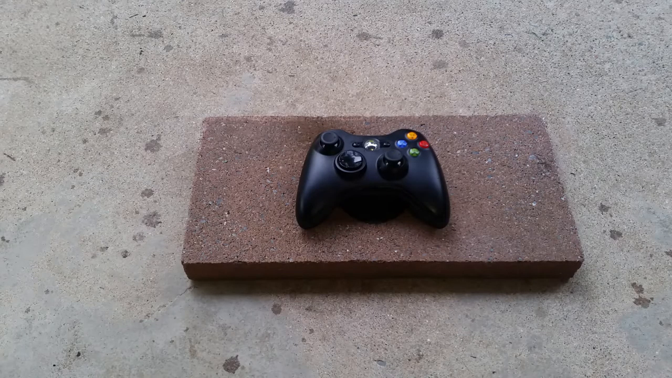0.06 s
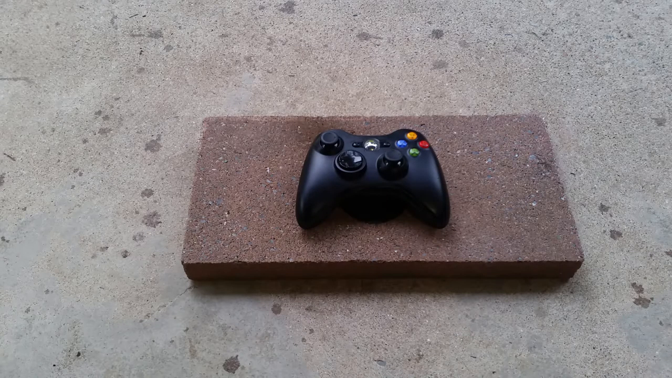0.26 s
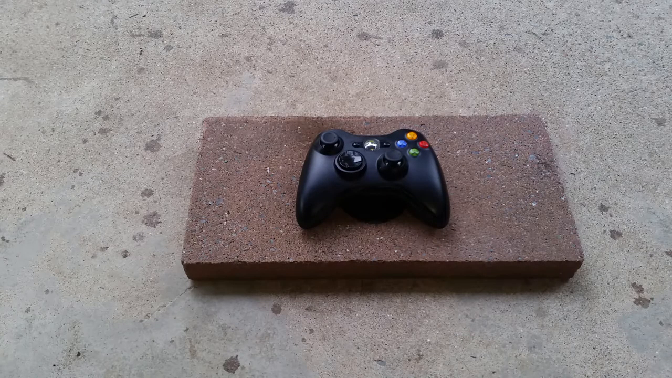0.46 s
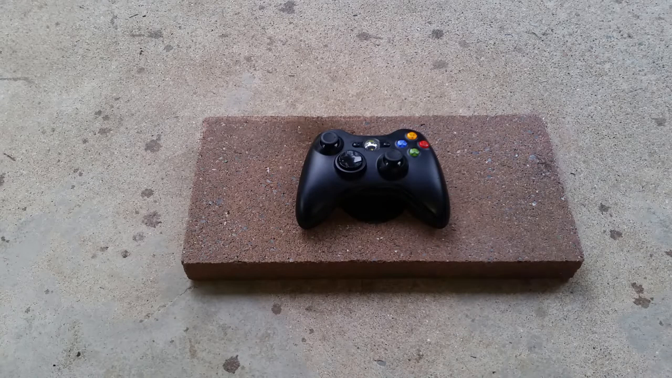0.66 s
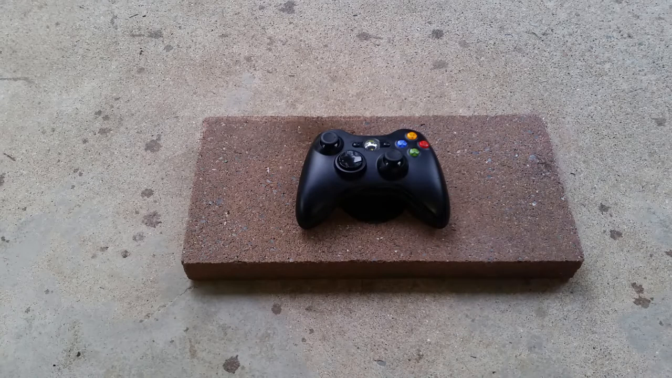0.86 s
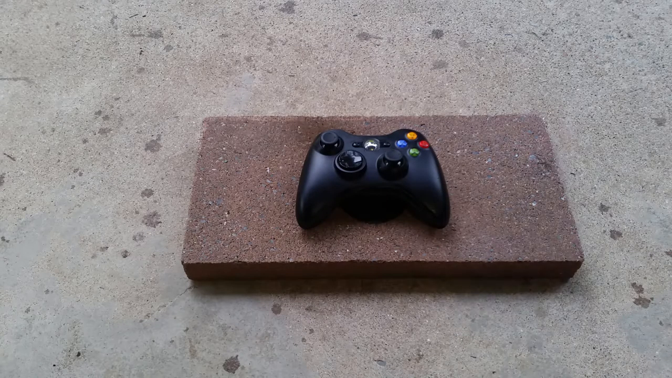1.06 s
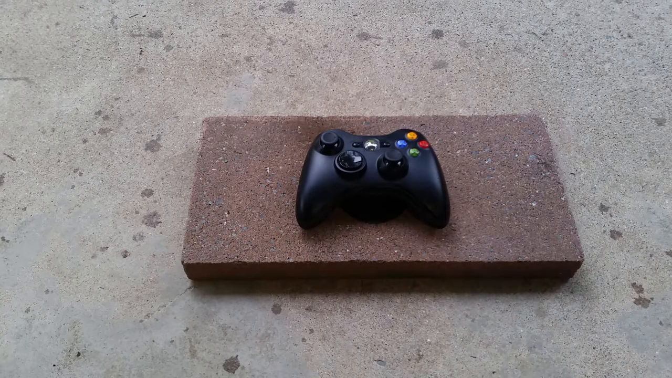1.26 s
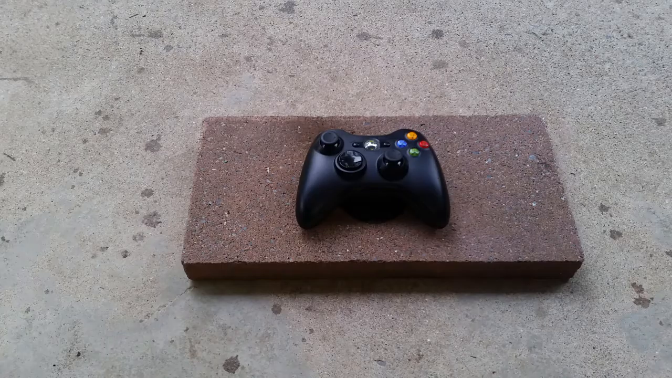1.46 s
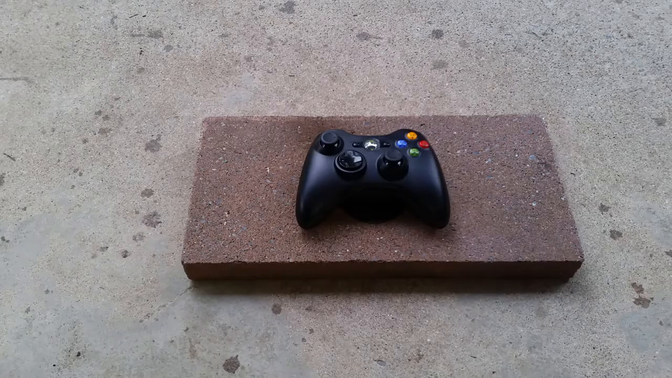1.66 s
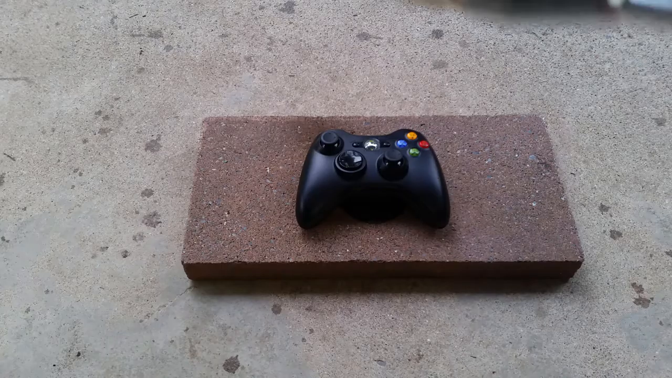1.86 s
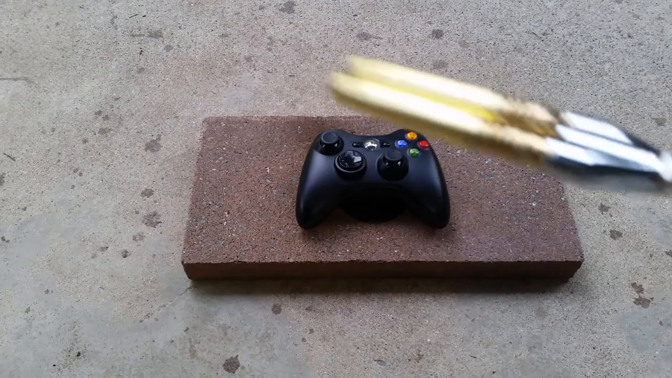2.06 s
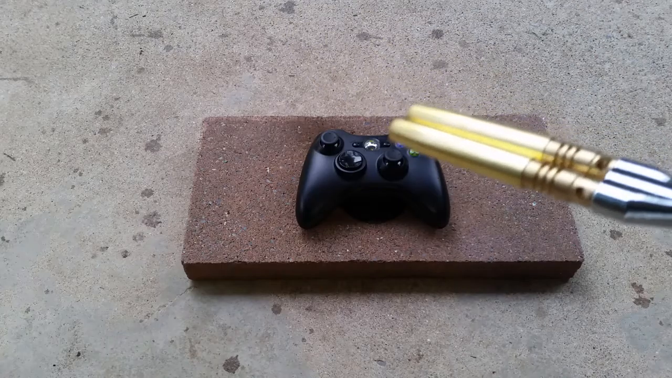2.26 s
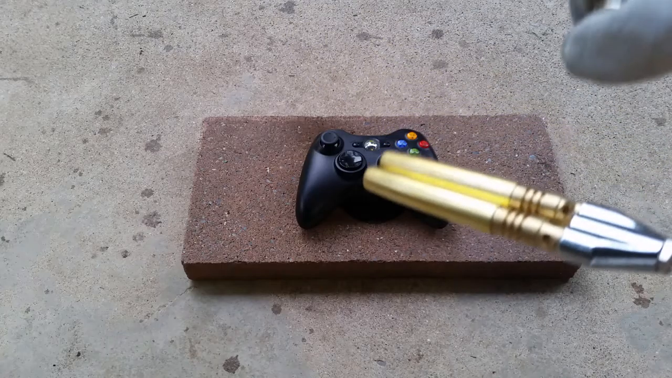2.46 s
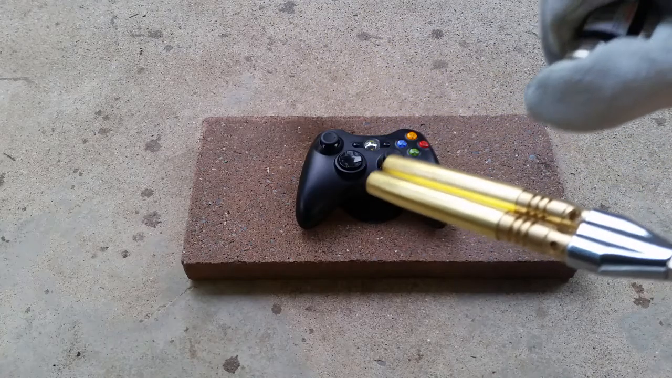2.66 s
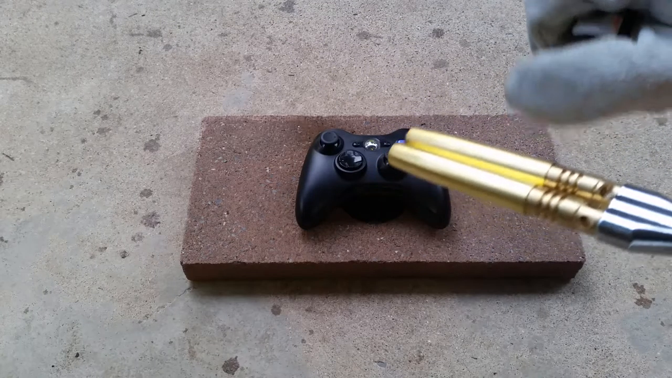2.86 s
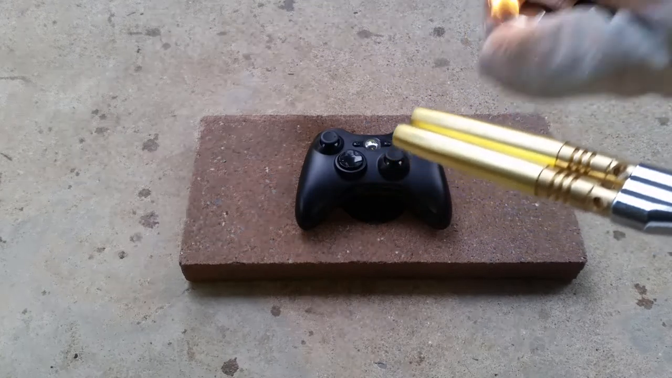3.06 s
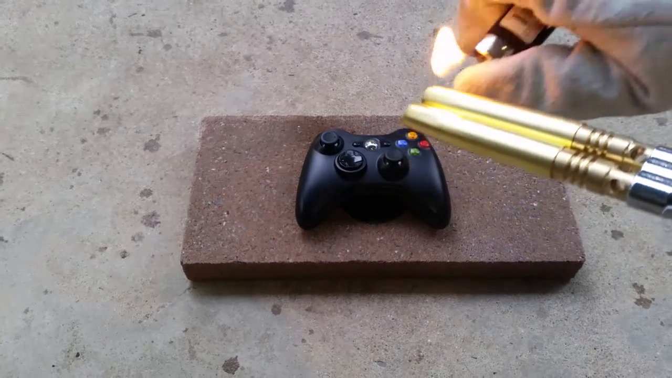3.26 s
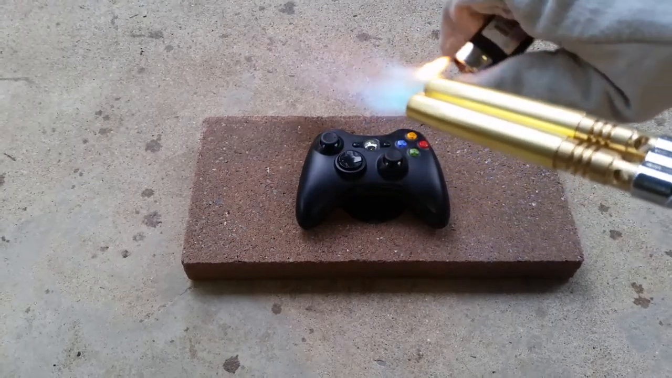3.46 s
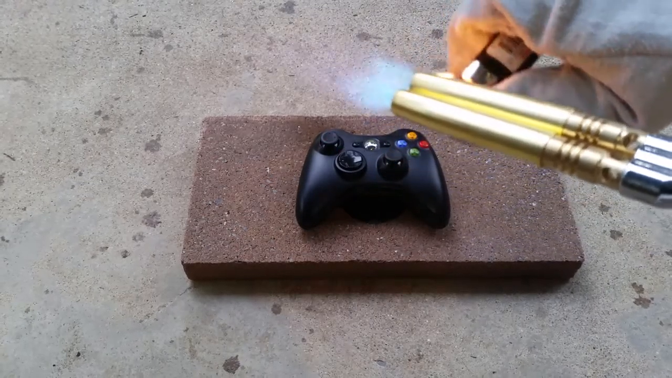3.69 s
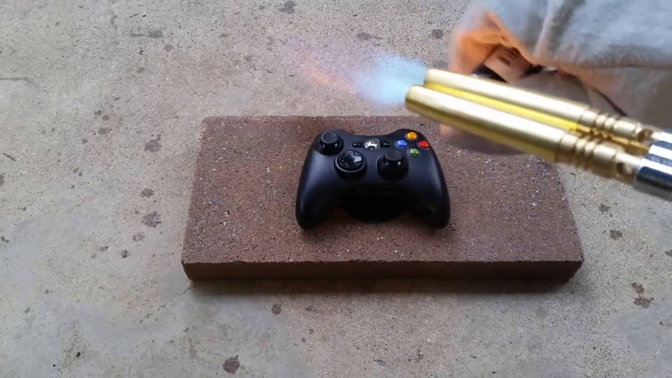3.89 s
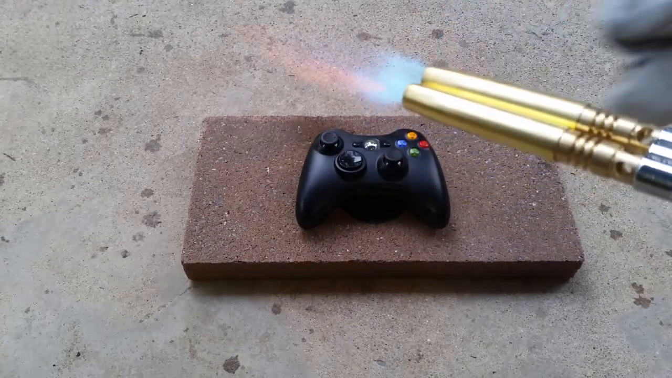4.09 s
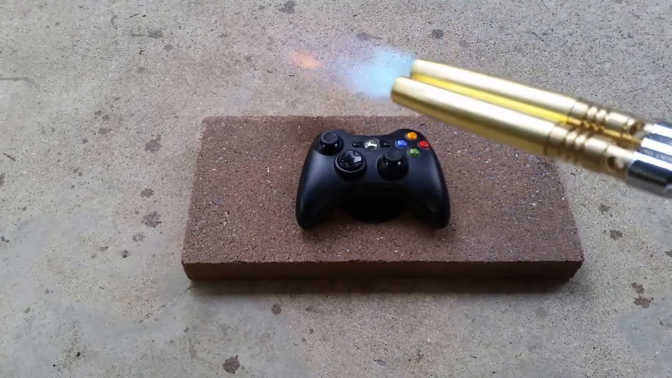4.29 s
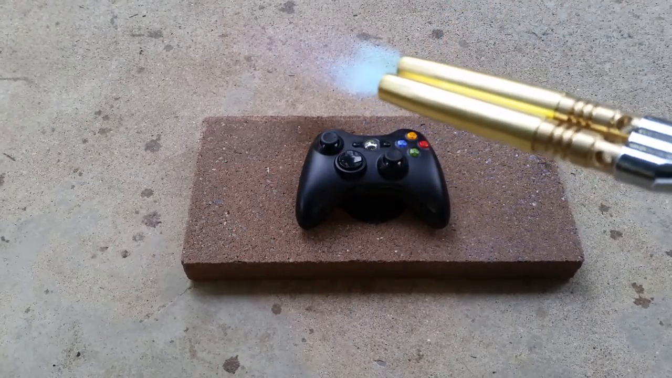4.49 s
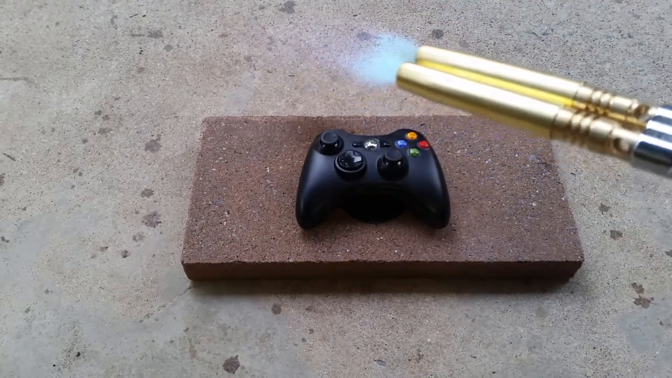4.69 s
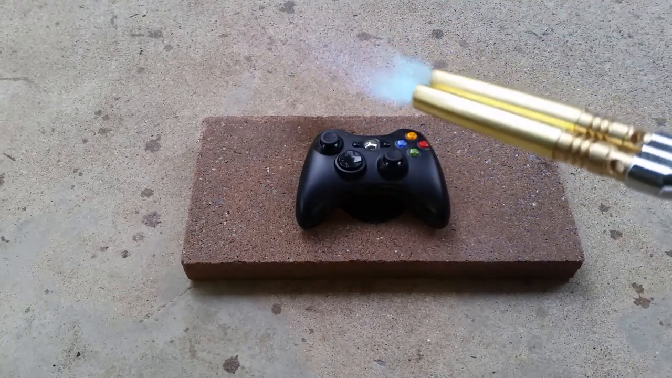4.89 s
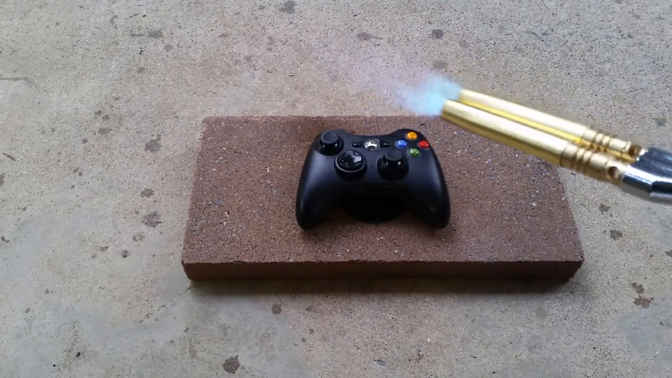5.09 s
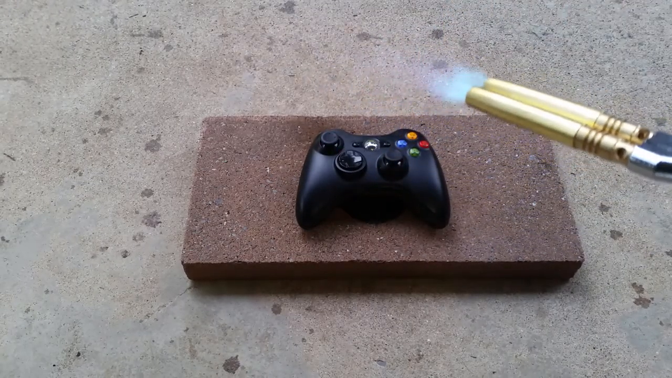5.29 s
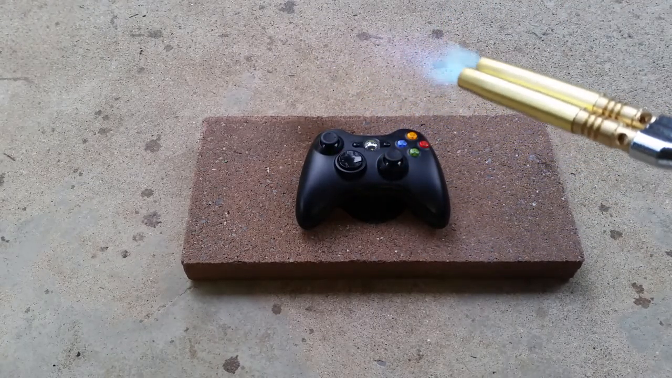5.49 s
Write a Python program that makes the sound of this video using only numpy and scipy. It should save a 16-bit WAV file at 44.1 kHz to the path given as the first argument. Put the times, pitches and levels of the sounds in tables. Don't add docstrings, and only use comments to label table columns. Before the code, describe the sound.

Close outdoor stereo sound of a twin-tube gas torch over concrete and a brick. Unlit gas hisses with breathy whistling tones that waver as the hand turns. A tiny gritty lighter scrape comes around three seconds, then gas catches with a low thump and a much louder, full, fluttering roar takes over. Its colour shifts as the torch lowers. Faint distant rumble sits beneath.

```python
import sys
import numpy as np
from scipy import signal
from scipy.io import wavfile
from scipy.ndimage import uniform_filter1d

SR = 44100
rng = np.random.default_rng(int(sys.argv[2]) if len(sys.argv) > 2 else 0)


def generate_wav(sig):
    pcm = np.round(np.clip(np.atleast_2d(sig).T, -1, 1) * 32767).astype(np.int16)
    wavfile.write(sys.argv[1], SR, pcm)


def elevation(decibels):
    levels = np.asarray(decibels, float)
    return 10 ** (levels / 20)


N = 244314
T = np.arange(N) / SR
HZ = np.fft.rfftfreq(1024, 1 / SR)[:, None]
FRAME_S = np.arange(N // 256 + 2) * 256 / SR
CATCH_S = 3.368
LEFT_LEADS_MS = 0.042

# pitch_hz, likeness (0-1)
LIKENESS = [(60, .99), (600, .98), (2000, .9), (4000, .78), (6000, .62), (14000, .55)]
# pitch_hz, right_density_db, lean_db
YARD_RUMBLE = [(25, -104, -13), (49.4, -101.5, -12), (102.4, -83.5, -2), (198, -90, -11),
               (330, -94.5, -11.5), (790, -104, 4.5), (1990, -115, 6)]
# time_s, level_db, length_s
RASP_GRIPS = [
    (2.996, -58, 0.0061),
    (3.02, -51, 0.0075),
    (3.035, -56.5, 0.0092),
]
# pitch_hz, density_db
FLINT_TONE = [(80, -32), (180, -29), (350, -32), (1000, -44), (3000, -38), (4800, -35.5), (5600, -44),
              (9000, -47), (14000, -58)]
# time_s, level_db, pitch_hz, length_s
GAS_POCKETS = [
    (3.380, -38, 169, 0.0027),
    (3.3872, -37, 255, 0.0033),
    (3.389, -38.5, 452, 0.0076),
    (3.398, -46, 112, 0.023),
    (3.4, -49.5, 62, 0.026),
    (3.412, -47, 504, 0.0036),
]
# time_s, front (0-1), left_lag_ms, ground_echo_ms
APPROACH_PATH = [
    (0, 0.11, 0.24, 3.2),
    (.5, 0.01, 0.2, 2.2),
    (.95, 0.24, 0.17, 4.3),
    (1.3, 0.47, -0.026, 1.74),
    (1.9, 0.68, -0.032, 2.1),
    (2.2, 0.71, 0.0023, 1.9),
    (3.37, 0.75, -0.0023, 1.38),
]
# time_s, nearer_db, turned_left (0-1), wrist_roll (-1 to 1)
HAND_MOVES = [(0, 1.5, 0.2, 0.089), (.2, -4, .15, 0.91), (.6, 3, .4, -0.91), (.85, -0.5, 0.5, -0.42),
              (1.2, -2, 0.45, -1), (1.4, 2.5, 0.73, 0.011), (1.65, 2, 0.7, 0.24), (1.9, -4, 0.87, 0.1),
              (2.0, -4, 0.7, 0.93), (2.15, -2, 0.2, -.3), (2.4, 0.5, .3, -0.015), (2.6, -5, 0.4, 0.25),
              (3.0, 3, .35, -0.34), (3.37, 6, 0, -.4)]
# time_s, pitch_hz
WHISTLE_PITCH = [
    (0, 1300),
    (.9, 1326),
    (1.97, 1350),
    (2.02, 1220),
    (2.28, 1290),
    (2.6, 1273),
    (3.37, 1240),
]
# pitch_hz, width_hz
NOZZLE_TONES = [(5220, 280), (6550, 290), (11750, 590), (13200, 670)]
# level_db, nearness_share, front_db, roll_db
BEAM_LEVELS = [
    (-50.5, 0.4, -5, 1.5),
    (-56, 0.55, -13.5, 0),
    (-57, 0.58, -0.1, 7),
    (-52.5, 0.65, -4, 0.8),
    (-56.5, 0.22, -3, 1.5),
]
# lean_db, turn_db, front_db, roll_db
BEAM_LEANS = [
    (-5, 8, -6, -4.5),
    (-26, 23, 12, .5),
    (-5.5, 4.5, -4, -8),
    (-18.5, 16, 4, -.5),
    (-15.5, 1.5, 12, -5),
]
# pitch_hz, width_hz, level_db, lean_db
STEADY_TONES = [(1020, 190, -64, -18), (1710, 100, -73.5, 2), (3240, 120, -77.5, 6), (8070, 250, -69, -0.5),
                (9810, 200, -68.5, -4.5), (14000, 700, -70, -10)]
# pitch_hz, right_density_db, lean_db, front_right_density_db, front_lean_db
COLD_HISS = [(273, -104, 1.5, -104, 8), (690, -91.5, -18, -98.5, -17), (1300, -81, -2, -99.5, 14),
             (2020, -91, -3, -99, -6), (2700, -99, 6, -103, 1), (3050, -92, -18, -99, -6),
             (4340, -93.5, -12.5, -101, -6), (5900, -100, -4, -94, -2), (7160, -96.5, 6, -100, -20),
             (8700, -93, -22, -97.5, 5), (10600, -92.5, -7, -97, -7), (14500, -91, -10, -102, -1)]
# pitch_hz, width_hz, level_db, lean_db
HOT_TONES = [(3700, 210, -61, -20), (4100, 130, -71, 4), (5250, 960, -65, -16), (6820, 470, -64, -18),
             (9260, 1100, -67.5, -16), (11500, 700, -60, -7), (13160, 700, -61.5, -7),
             (14200, 600, -69, -7)]
# pitch_hz, right_density_db, lean_db
ROAR_TONE = [(25.3, -134, -33), (61, -92, 5), (149, -71.5, -2.5), (305, -70.5, -4.5), (620, -68.5, -4),
             (1130, -74, -3.5), (1554, -76.5, -1.5), (2140, -83.5, -0.5), (2950, -87, -2.5),
             (4470, -95.5, -3.5), (7600, -101, 4), (9100, -106, 0.5), (10300, -102, -1.5),
             (14400, -108.5, -15)]
# time_s, lowered (0-1)
LOWERING = [
    (3.4, 0.19),
    (4.8, 0.04),
    (4.95, 0.22),
    (5.1, 0.45),
    (5.22, 0.96),
    (5.54, 0.98),
]
# high_delay_ms, high_gain, low_delay_ms, low_gain
LEFT_ECHOES = [(1.27, 0.18, 1.07, 0.23), (1.69, 0.15, 1.31, 0.34), (1.83, 0.15, 1.6, -0.26),
               (2.44, 0.29, 2.11, 0.23), (2.75, -0.28, 2.32, -0.21), (3.09, -0.25, 2.76, -0.14),
               (3.71, 0.26, 3.05, -0.17), (4.77, -0.13, 4.9, 0.06), (5.08, 0.14, 4.9, 0.35),
               (5.32, -0.28, 4.6, 0.14), (8.3, -0.28, 20, -0.0074)]
RIGHT_ECHOES = [(1.116, 0.33, 0.39, 0.08), (1.676, 0.36, 1.292, 0.67), (1.166, -0.11, 1.665, -0.34),
                (2.3, 0.033, 1.93, 0.33), (2.53, -0.089, 2.32, -0.31), (2.83, -0.14, 2.57, -0.12),
                (5.5, 0.049, 3.26, 0.0063), (5.2, -0.29, 3.6, 0.09), (8.7, 0.45, 3.26, 0.17),
                (14, 0.14, 5.38, 0.041), (5.7, 0.074, 6.45, 0.031)]
# pitch_hz, left_density_db, right_density_db
FAINTEST_KEPT = [(1500, -112, -112), (2500, -102.5, -100.5), (7000, -102, -99), (9000, -102.5, -100),
                 (11000, -102.5, -99.5), (14500, -104, -101)]


def read(points, column=1):
    rows = np.transpose(points)
    return np.interp(np.log(HZ + 1), np.log(rows[0] + 1), rows[column])


def curve(rows, t=FRAME_S):
    s, *columns = np.transpose(rows)
    return [np.interp(t, s, c) for c in columns]


def sides(right_db, lean_db):
    return elevation(2 * np.array([right_db + lean_db, right_db + 0 * lean_db]))


def steady(power):
    return power * np.ones_like(FRAME_S)


def mode(hz, width_hz, level_db, lean_db, skirt=1.26):
    shape = (1 + (2 * (HZ - hz) / width_hz) ** 2) ** -skirt / width_hz
    return sides(steady(level_db), steady(lean_db))[:, None] * shape


def delay(ms):
    return np.exp(-2j * np.pi * HZ * ms / 1000)


def slow(hz):
    x = signal.lfilter(*signal.butter(2, np.clip(hz, 1, 2000), fs=SR), rng.standard_normal(N))
    return x / x.std()


def blotches(shape, bins, frames):
    x = uniform_filter1d(rng.standard_normal(shape), bins, axis=-2)
    x = uniform_filter1d(x, frames, axis=-1)
    return x / x.std()


def noise(power, path=1, patchy_db=1.2):
    right, own = signal.stft(rng.standard_normal((2, N)), nperseg=1024, noverlap=768)[2]
    same = np.clip(read(LIKENESS), 0, 1)
    bend = 1.3 * blotches(right.shape, bins=16, frames=120) / (1 + (3500 / (HZ + 1)) ** 2)
    left = same * right * np.exp(1j * bend) + np.sqrt(1 - same ** 2) * own
    left = left * delay(-LEFT_LEADS_MS)
    patches = elevation(patchy_db * blotches((2,) + right.shape, bins=4, frames=44))
    gain = np.sqrt(power * SR / 2) * patches * path
    both = np.array([left, right]) * gain[..., :right.shape[1]]
    return signal.istft(both, nperseg=1024, noverlap=768)[1][:, :N]


def yard():
    return noise(steady(sides(read(YARD_RUMBLE), read(YARD_RUMBLE, column=2))), patchy_db=0.0)


def lighter():
    grip = sum(elevation(db) * np.exp(-((T - s) / length_s) ** 2) for s, db, length_s in RASP_GRIPS)
    scrape = noise(steady(sides(read(FLINT_TONE), -5.5)), patchy_db=2.5)
    grit = elevation(1.1 * slow(500))
    return scrape * grip * grit


def thump():
    push = 0
    for s, db, hz, length_s in GAS_POCKETS:
        swell = elevation(db) * np.exp(-((T - s) / length_s) ** 2)
        push = push - swell * np.cos(2 * np.pi * hz * (T - s))
    return push * elevation(np.array([[-2.2], [1.8]]))


def cold_jet():
    whistle_hz, = curve(WHISTLE_PITCH)
    near_db, turn, roll = curve(HAND_MOVES)
    front, lag_ms, ground_ms = curve(APPROACH_PATH)
    levels_db = [db + share * near_db + front_db * front + roll_db * roll
                 for db, share, front_db, roll_db in BEAM_LEVELS]
    leans_db = [db + turn_db * turn + front_db * front + roll_db * roll
                for db, turn_db, front_db, roll_db in BEAM_LEANS]
    power = mode(whistle_hz, 107, levels_db[0], leans_db[0], skirt=2.18)
    for (hz, width_hz), db, lean_db in zip(NOZZLE_TONES, levels_db[1:], leans_db[1:]):
        power += mode(hz, width_hz, db, lean_db)
    power += sum(mode(*row) for row in STEADY_TONES)
    hiss_db = (1 - front) * read(COLD_HISS) + front * read(COLD_HISS, column=3)
    hiss_lean_db = (1 - front) * read(COLD_HISS, column=2) + front * read(COLD_HISS, column=4)
    power += sides(hiss_db, hiss_lean_db)
    ground = 0.086 * delay(ground_ms) / np.sqrt(1 + (HZ / 4000) ** 2)
    path = np.array([delay(lag_ms) * (1 + 0.33 * ground), 1 + ground])
    unlit = np.clip((CATCH_S - T) / .012 + .5, 0, 1)
    return noise(power, path, patchy_db=2.1) * unlit


def hot_jet():
    hiss = noise(sum(mode(*row) for row in HOT_TONES), patchy_db=2.0)
    return hiss * np.clip((T - CATCH_S) / .012 + .6, 0, 1)


def echoes():
    low, = curve(LOWERING)
    dull = 1 / np.sqrt(1 + (HZ / 4000) ** 2)
    paths = []
    for side in (LEFT_ECHOES, RIGHT_ECHOES):
        bounces = sum((high_gain + (low_gain - high_gain) * low) * delay(high_ms + (low_ms - high_ms) * low)
                      for high_ms, high_gain, low_ms, low_gain in side)
        paths.append(1 + dull * bounces)
    return np.array(paths)


def flame_roar():
    lit_s = np.maximum(FRAME_S - CATCH_S, 0)
    lowered, = curve(LOWERING)
    flare_db = 7 * np.exp(-lit_s / 0.005)
    settle_db = 2.35 * np.exp(-lit_s / 1)
    roar_db = -0.87 + flare_db + settle_db + 0.63 * lowered
    gust_db = .8 * np.interp(FRAME_S, T, slow(2.9))
    low_db = -2 * np.exp(-lit_s / 0.042) + gust_db
    edge_db = -4.5 + 2.5 * lit_s + 4 * np.exp(-lit_s / 0.39)
    low = 1 / (1 + (HZ / 300) ** 4)
    edge = 1 / (1 + (1800 / (HZ + 1)) ** 4)
    hot = 1 / (1 + (4500 / (HZ + 1)) ** 4)
    change_db = (1 - hot) * (roar_db + low * low_db + edge * edge_db)
    power = sides(read(ROAR_TONE), read(ROAR_TONE, column=2)) * elevation(2 * change_db)
    roar = noise(power, echoes(), patchy_db=1.4)
    flutter = elevation(0.37 * slow(30))
    spread = np.clip((T - CATCH_S) / .016, 0, 1) ** 2
    return roar * flutter * spread


def scene():
    return yard() + lighter() + thump() + cold_jet() + hot_jet() + flame_roar()


def top_cut(x):
    return signal.sosfilt(signal.butter(12, 14590, fs=SR, output="sos"), x)


def record(dry):
    z = signal.stft(dry, nperseg=1024, noverlap=768)[2]
    cell = uniform_filter1d(abs(z) ** 2, size=3, axis=1)
    cell = uniform_filter1d(cell, size=7, axis=2)
    cell_db = 10 * np.log10(abs(cell) * 1024 / SR * 4 / 3 + 1e-20)
    faintest_db = np.array([read(FAINTEST_KEPT), read(FAINTEST_KEPT, column=2)])
    cut_db = np.clip(30 * (cell_db - faintest_db), -45, 0)
    kept = signal.istft(z * elevation(cut_db), nperseg=1024, noverlap=768)[1][:, :N]
    return top_cut(kept)


dry = scene()
out = record(dry)
generate_wav(out)
```